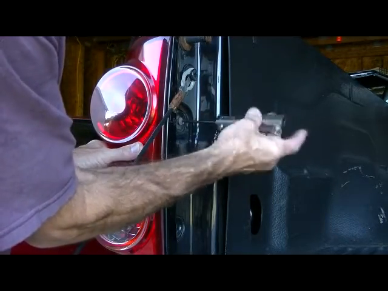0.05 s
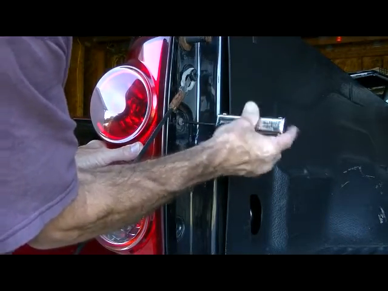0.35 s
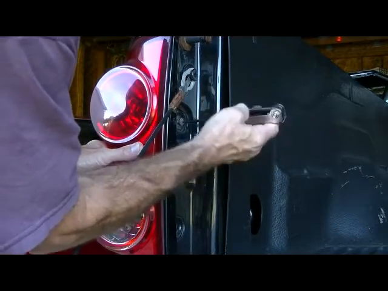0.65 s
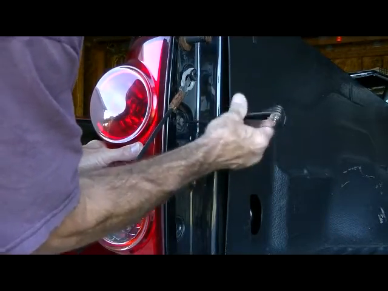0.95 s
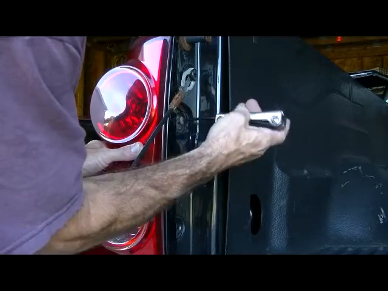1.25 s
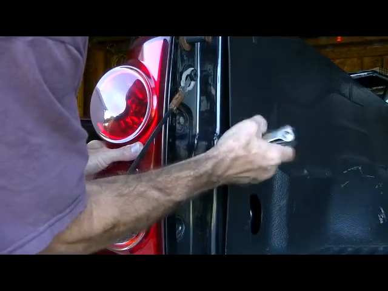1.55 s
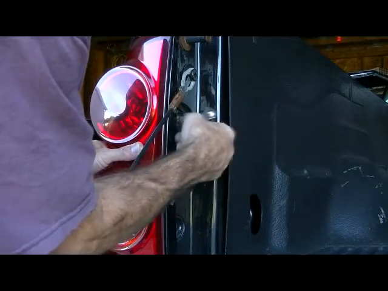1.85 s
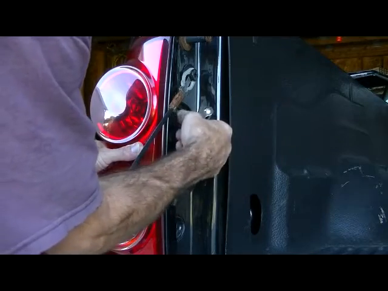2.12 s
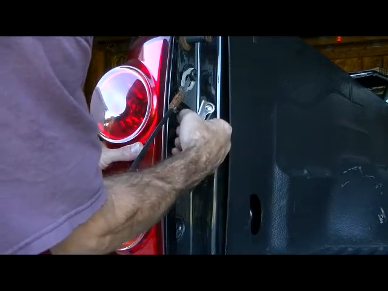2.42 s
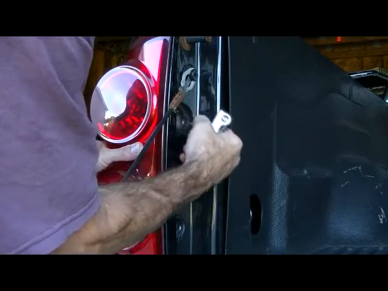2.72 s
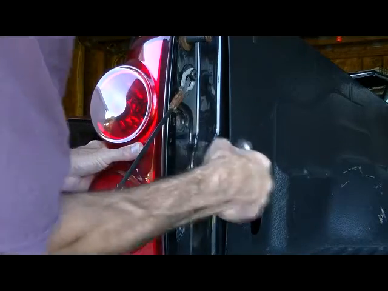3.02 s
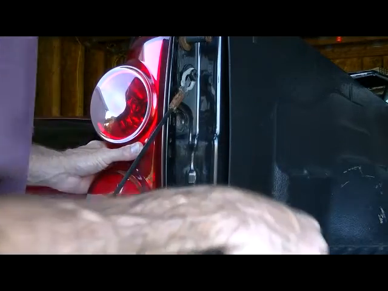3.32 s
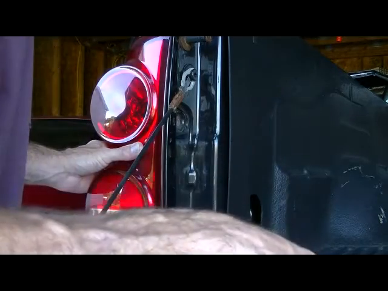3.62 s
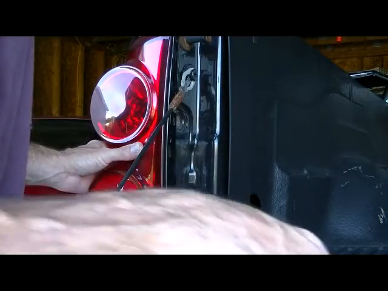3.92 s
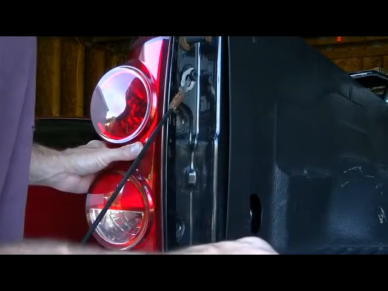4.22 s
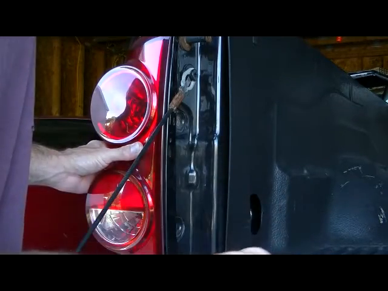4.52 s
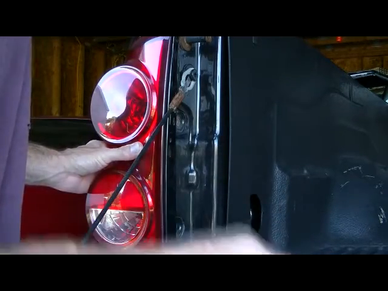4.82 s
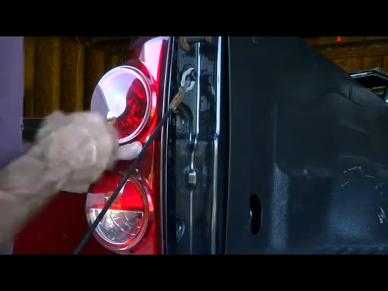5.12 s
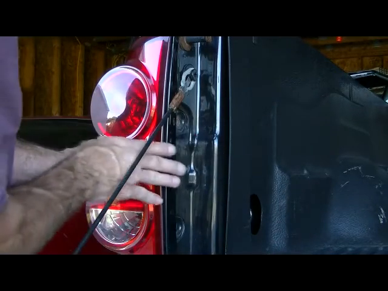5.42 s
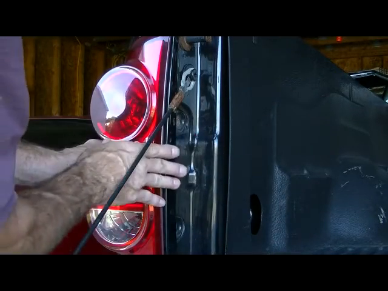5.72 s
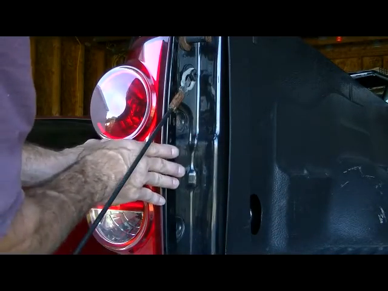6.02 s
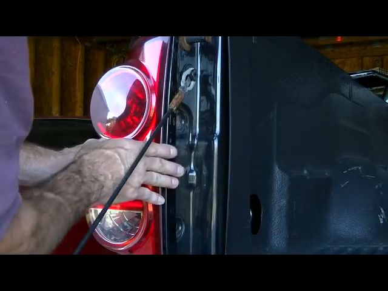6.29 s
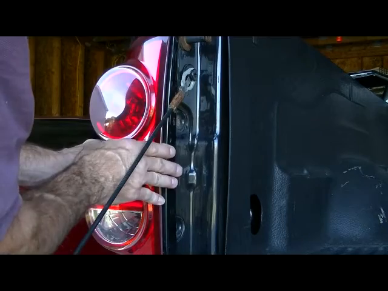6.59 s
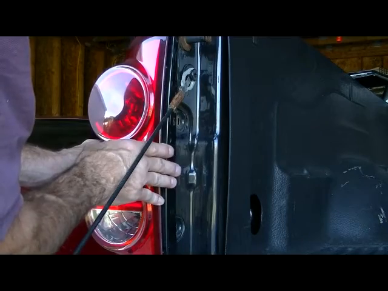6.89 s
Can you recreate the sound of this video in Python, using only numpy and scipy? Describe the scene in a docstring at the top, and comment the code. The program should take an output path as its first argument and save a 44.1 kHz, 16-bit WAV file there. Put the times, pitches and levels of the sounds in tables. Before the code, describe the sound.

Over soft outdoor air and a far motor hum that slowly sinks in pitch, a steel tool ticks and rasps at a screw while a plastic lamp housing bumps. Midway comes a quick, bright clatter as the tool lands on a lined tailgate, then louder hollow knocks. Quiet rubbing and small plastic bumps follow. Everything is heard close by, leaning right, with a slight echo from a shed roof.

```python
"""Outdoor air and a far motor, slowly sinking in pitch, sound throughout. Under a shed roof a folding steel
key set unscrews a truck's plastic tail lamp: strokes scrape in tiny slips, keys tick, the bumped housing
booms; a faint high whine lasts until 2 s. At 3.7 s the key set clatters onto the plastic-lined tailgate.
From 4.5 s heavy knocks ring the hollow panel. From 6.1 s hands rub and bump the loose lamp."""
import sys
import numpy as np
from scipy import signal
from scipy.fft import rfft, irfft, next_fast_len
from scipy.io import wavfile
from scipy.ndimage import map_coordinates

SR = 44100
rng = np.random.default_rng(int(sys.argv[2]) if len(sys.argv) > 2 else 0)


def master_out(mix):
    """Clip the mix to full scale and print it as 16-bit PCM to the path in sys.argv[1]."""
    frames = np.transpose(np.atleast_2d(mix))
    ceiling = np.clip(frames, -1, 1)
    pcm = np.round(ceiling * 32767).astype(np.int16)
    wavfile.write(sys.argv[1], SR, pcm)


N = 310974

# outdoor air spectrum: (frequency [Hz], level [dB])
AIR_SPECTRUM = [(15, -72), (25, -49), (37, -35), (59, -30), (116, -11), (144, -12.5), (169, -5.5),
                (198, -10), (260, -8.5), (378, -14.5), (445, -11.5), (804, -10.5), (2920, -25),
                (4380, -25.5), (15500, -38)]
# broad air resonances: (centre [Hz], width [Hz], level [dB])
AIR_RESONANCES = [(73, 17, -22), (174, 37, -16), (855, 31, -11.5), (4460, 140, -23)]
# left-right likeness of the air: (frequency [Hz], correlation [0..1])
AIR_COHERENCE = [(60, 1), (130, 0.44), (290, 0), (640, 0.14), (3000, 0.12), (15000, 0.13)]
# far motor's main tone: (time [s], pitch [Hz], level [dB])
MOTOR_GLIDE = [(0, 120.2, -63), (2.4, 119.3, -58.5), (4.2, 116.5, -63.5), (5.3, 114, -70),
               (6.1, 104.8, -61), (7.05, 100.3, -58)]

# rubbing strokes: (start [s], rise [s], length [s], groan [dB], rasp [dB], scrape [dB])
RUB_STROKES = [(0.005, 0.021, 0.14, -45.5, -52.5, -52.5), (0.122, 0.03, 0.089, -49.5, -65, -61),
               (0.428, 0.025, 0.16, -43, -50, -48.5), (0.614, 0.024, 0.2, -51, -65, -62),
               (1.018, 0.039, 0.058, -49, -49, -52), (1.12, 0.035, 0.095, -42.5, -53.5, -52),
               (2.382, 0.022, 0.12, -47.5, -53, -54.5), (2.545, 0.016, 0.065, -46, -41, -51),
               (3.15, 0.099, 0.32, -71, -70, -63), (4.264, 0.03, 0.028, -54, -67, -54.5),
               (6.101, 0.062, 0.1, -57, -61, -56.5), (6.221, 0.0065, 0.018, -43, -48.5, -74),
               (6.37, 0.065, 0.19, -54.5, -53.5, -57), (6.624, 0.045, 0.14, -54.5, -54.5, -56),
               (6.78, 0.047, 0.062, -55.5, -57, -64)]
# housing groan: (frequency [Hz], level [dB])
GROAN_SPECTRUM = [(30, -50), (90, -24), (200, 0), (450, 1), (570, 1), (720, 4.5), (1050, -2), (1400, -8.5),
                  (3500, -32)]
# thread rasp: (frequency [Hz], level [dB])
RASP_SPECTRUM = [(700, -20), (1100, 1), (1500, -1), (1870, 5), (2080, 0), (2300, -5.5), (2600, 3),
                 (2900, -18.5), (5000, -23), (7000, -48)]
# scrape: (frequency [Hz], level [dB])
SCRAPE_SPECTRUM = [(1500, -8), (3000, 1), (3900, 2), (4400, 6.5), (4800, 0), (5200, 2), (6300, -14),
                   (8000, -8), (10300, -7.5), (12500, -17), (15000, -38)]
# grit in the scrape: (frequency [Hz], level [dB])
GRIT_SPECTRUM = [(4000, -25), (7000, 19), (10500, -17), (12500, -4), (15000, -3)]

# decay of dense panel modes: (frequency [Hz], T60 [s])
PANEL_DECAY = [(100, 0.64), (300, 0.5), (700, 0.25), (1800, 0.18), (4800, 0.11), (7500, 0.073),
               (12000, 0.023)]
# keys ticking on their holder: (time [s], level [dB], brightness [dB], ring [Hz])
KEY_TICKS = [(0.048, -12, -2, 3020), (0.059, -15, -12, 3210), (0.151, -29, -13, 4470),
             (0.192, -32, -7, 4750), (0.451, -32.5, 2, 10600), (0.656, -28, -9, 3600),
             (0.934, -34, -19, 3900), (1.068, -28, -13, 11600), (1.077, -35, 3, 12000),
             (1.172, -29, -7, 8550), (1.212, -27.5, -16, 5670), (1.322, -29, -34, 3640),
             (1.599, -29, -18, 2330), (2.381, -23, -12, 3700), (5.578, -29.5, -41, 2070),
             (5.746, -40, 1.5, 13100), (6.527, -29.5, -12, 4450), (6.744, -33, -5, 4460)]
# modes common to all keys: (frequency [Hz], level [dB], T60 [s])
KEY_MODES = [(2280, -7, 0.15), (3190, -13, 0.13), (3610, -6, 0.1), (4280, -3.5, 0.074), (4560, -12, .055),
             (6121, -1.5, 0.11), (6770, -2, 0.088), (10900, -6, 0.055), (12100, -7, 0.044),
             (13330, -14, .04)]
# key tick colour: (frequency [Hz], gain [dB])
TICK_EQ = [(40, -61), (300, -12), (1000, -4.5), (1500, -16.5), (2000, 1.5), (2600, -8), (3300, -0.5),
           (4800, 0), (6600, -6.5), (7500, -4.5), (10000, -6.5), (11900, 5), (13000, -8), (15500, -14)]

# housing shifting in its seat: (time [s], level [dB], thump [dB], hardness [dB], ring [Hz], lift [dB])
HOUSING_BUMPS = [(0.149, -33, 10, 11, 463, 7), (0.181, -30, 11.5, 4, 433, 3), (0.244, -43, 15, -10, 232, 7),
                 (0.458, -24.5, -4, -16, 670, 8), (0.835, -34.5, 13, 2, 504, 7.5),
                 (1.052, -18.5, -17, -2, 970, 5), (1.080, -12.5, -4.5, -1.5, 320, 7),
                 (1.134, -25, 2.5, -2, 696, 14), (1.178, -27.5, 6.5, 0, 1030, 12),
                 (1.318, -23, -27, 0, 764, 10), (2.146, -19, -22.5, -7, 660, 11),
                 (2.258, -27.5, -12, -5, 793, 17.5), (2.38, -14.5, -14, -5.5, 495, 11),
                 (3.192, -43.5, 9.5, 11, 344, 6.5), (6.226, -25.5, 9.5, -5, 573, 6),
                 (6.279, -29.5, 5, -6, 382, 13)]
# lamp housing modes: (frequency [Hz], level [dB], T60 [s])
HOUSING_MODES = [(196, -4.5, 0.39), (236.2, -5.5, 0.27), (338, -6.5, 0.51), (463, -5.5, 0.84),
                 (552.3, 15, 0.084), (681, -0.5, 0.31), (849.4, 11, 0.076), (1049, 5.5, 0.19),
                 (1560, -24, 0.16), (2020, -2, 0.14), (2700, -12, .08)]
# housing bump colour: (frequency [Hz], gain [dB])
BUMP_EQ = [(35, -31), (110, 0.5), (200, 9), (400, 7.5), (800, 4), (1600, -0.5), (3000, -4), (5000, -6),
           (6500, -9), (11500, -5), (15000, -16)]

# key set hitting the liner: (time [s], level [dB], thump [dB], hardness [dB])
CLATTER_HITS = [(3.6518, -12, -33, -4), (3.6908, -2.5, -12, 5), (3.814, -18.5, -8, -15),
                (3.836, -16, -6.5, -33), (3.846, -32, 9, 10), (3.8612, 1.5, -30, -4.5),
                (3.8745, -1, -22, -1), (3.892, -18, -12, 1), (3.9125, -6.5, -14, -3),
                (3.946, -18, -15, -10), (4.075, -30.5, 1, -7), (4.233, -31, 2, -7), (4.293, -23, -14, -16)]
# modes of the key set on the liner: (frequency [Hz], level [dB], T60 [s])
KEY_SET_MODES = [(627, -6, 0.22), (937, -4.5, 0.12), (1030, -4, 0.059), (1235, -8.5, 0.16),
                 (1425, -1, 0.074), (1704, -23, 0.073), (1815, -1.5, 0.087), (2405, 7, 0.033),
                 (2850, 12, 0.023), (3000, -3, 0.033), (3170, 4, 0.027), (4430, -1, 0.048),
                 (4960, 10, 0.02), (5270, 16, 0.011), (8550, 11, 0.018)]
# clatter colour: (frequency [Hz], gain [dB])
CLATTER_EQ = [(35, -23), (110, 0), (180, 1.5), (400, 7), (600, 6.5), (950, 7.5), (1300, -3.5), (1700, 1),
              (2100, -3), (3000, -4), (3900, -5.5), (5200, -3), (6400, -10.5), (8400, -6.5), (10500, -19),
              (15000, -32)]

# heavy tailgate knocks: (time [s], level [dB], thump [dB], hardness [dB])
TAILGATE_KNOCKS = [(4.5304, -10.5, -6, -17), (4.572, -28, 8, 4), (4.7137, 5, -6, -1.5),
                   (4.826, 3, -16.5, -12.5), (4.830, 5, -5, -1), (4.837, 2, -0.5, -6.5)]
# lined tailgate modes: (frequency [Hz], level [dB], T60 [s])
TAILGATE_MODES = [(179.7, -3, 0.2), (219.8, 2.5, 0.22), (337, 1, 0.29), (402.6, 4, 0.15), (482, -2.5, 0.37),
                  (532, -5, 0.29), (606, 0, 0.2), (743, 7.5, 0.081), (802, 3.5, 0.073), (860, 4, 0.085),
                  (1058, 1.5, 0.078), (1264, 2, 0.075), (1430, 7, 0.071), (1535, -4, 0.14),
                  (2190, -2, 0.12), (2354, -1.5, 0.13), (2750, -15, .11), (3530, -11, 0.069),
                  (4160, -7, 0.087), (4570, -1, 0.098), (5200, 0, 0.084)]
# knock colour: (frequency [Hz], gain [dB])
KNOCK_EQ = [(35, -30), (80, -29), (125, -5), (210, 3.5), (270, 1), (400, 4), (750, 7.5), (1150, 2.5),
            (1500, 6.5), (2000, 0.5), (3000, -5), (5200, -0.5), (6300, -3), (9000, -3.5), (15000, -24)]

# shed reverberation: (frequency [Hz], T60 [s])
SHED_DECAY = [(100, 0.45), (500, 0.54), (2000, 0.39), (6000, 0.54), (14000, 0.59)]
# balance of the work sounds: (frequency [Hz], left minus right [dB])
WORK_BALANCE = [(110, -12), (380, -8), (700, -6.5), (1300, -4.5), (2400, -3.5), (8000, -2)]
# balance of the background: (frequency [Hz], left minus right [dB])
BACKGROUND_BALANCE = [(60, -15), (110, -8.5), (200, -3.5), (400, -3), (2400, -1.5), (15000, 0)]


def amp(db):
    """Decibels to gain."""
    return 10 ** (np.asarray(db) / 20)


def unit_rms(x):
    """Scale to rms 1."""
    return x / np.sqrt(np.mean(x ** 2) + 1e-20)


def curve(points, hz):
    """Read (frequency, value) points on a log-frequency axis."""
    knots_hz, values = np.transpose(points)
    return np.interp(np.log(hz + 1), np.log(knots_hz + 1), values)


def wobble(rate_hz):
    """Smooth random curve, rate_hz knots a second."""
    knots = rng.standard_normal(int(N * rate_hz / SR) + 4)
    return map_coordinates(knots, [np.arange(N) * rate_hz / SR])


def filtered(x, gain):
    """Zero-phase filter, response gain(hz)."""
    size = next_fast_len(N + SR // 2)
    return irfft(rfft(x, size) * gain(np.fft.rfftfreq(size, 1 / SR)), size)[..., :N]


def coloured(x, gain_db, size=32768):
    """Minimum-phase filter for a short sound, response gain_db(hz)."""
    cepstrum = irfft(np.log(amp(gain_db(np.fft.rfftfreq(size, 1 / SR)))))
    cepstrum[1:size // 2] *= 2
    cepstrum[size // 2 + 1:] = 0
    return irfft(rfft(x, size) * np.exp(rfft(cepstrum)))[:len(x)]


def panned(x, balance):
    """Lean each frequency left or right."""
    return filtered(x, lambda hz: amp(np.outer([.5, -.5], curve(balance, hz))))


def add(track, time_s, sound):
    """Mix a sound in at time_s."""
    part = track[max(round(time_s * SR), 0):][:len(sound)]
    part += sound[:len(part)]


def outdoor_air():
    """Steady stereo noise with a few broad resonances."""
    def mid_side_gain(hz):
        angle_rad = np.arccos(np.clip(curve(AIR_COHERENCE, hz), -1, 1)) / 2
        peak_power = sum(amp(db) ** 2 / (1 + (2 * (hz - centre_hz) / width_hz) ** 4)
                         for centre_hz, width_hz, db in AIR_RESONANCES)
        power = amp(curve(AIR_SPECTRUM, hz)) ** 2 + peak_power
        return np.sqrt(power) * [np.cos(angle_rad), np.sin(angle_rad)]
    mid, side = filtered(rng.standard_normal((2, N)), mid_side_gain)
    breeze = amp(.5 * wobble(3))
    return amp(-51.5) * breeze * unit_rms(np.array([mid + side, mid - side]))


def wavering_tone(hz, db):
    """Sine wavering slightly in pitch and level."""
    phase_rad = 2 * np.pi * np.cumsum(hz + .7 * wobble(9)) / SR
    return amp(db + 1.5 * wobble(6)) * unit_rms(np.sin(phase_rad))


def far_motor(undertone_fade_db_per_s=1.4, hum_rise_db_per_s=0.4):
    """Two motor tones sink together beside a hum of steady pitch."""
    t = np.arange(N) / SR
    times_s, pitches_hz, levels_db = np.transpose(MOTOR_GLIDE)
    pitch_hz = np.interp(t, times_s, pitches_hz)
    undertone = wavering_tone(hz=0.64 * pitch_hz, db=-65.5 - undertone_fade_db_per_s * t)
    main = wavering_tone(hz=pitch_hz, db=np.interp(t, times_s, levels_db))
    hum = wavering_tone(hz=172.6, db=-66 + hum_rise_db_per_s * t)
    return main + undertone + hum


def stroke_force(start_s, rise_s, length_s, sag_db_per_s=53, release_db_per_s=240):
    """Force builds, eases while sliding and dies when the hand stops."""
    t = np.maximum(np.arange(N) / SR - start_s, 0)
    sag_db = sag_db_per_s * np.maximum(t - rise_s, 0)
    release_db = release_db_per_s * np.maximum(t - length_s, 0)
    return np.minimum(t / rise_s, 1) * amp(-sag_db - release_db)


def friction(spectrum, slips_per_s, spread_db):
    """Dense tiny slips of uneven size, rms 1."""
    slipping = rng.random(N) < slips_per_s / SR
    slips = slipping * rng.standard_normal(N) * amp(spread_db * wobble(120))
    return unit_rms(filtered(slips, lambda hz: amp(curve(spectrum, hz))))


def rubbing():
    """Fingers, screw and housing slide in short strokes: shell groans, thread rasps, grit scrapes."""
    forces = sum(np.outer(amp(levels_db), stroke_force(start_s, rise_s, length_s))
                 for start_s, rise_s, length_s, *levels_db in RUB_STROKES)
    groan = friction(GROAN_SPECTRUM, slips_per_s=12000, spread_db=0)
    rasp = friction(RASP_SPECTRUM, slips_per_s=3300, spread_db=3.5)
    scrape = friction(SCRAPE_SPECTRUM, slips_per_s=5600, spread_db=1.5)
    grit = amp(-16) * friction(GRIT_SPECTRUM, slips_per_s=250, spread_db=12.5)
    return np.sum(forces * [groan, rasp, scrape + grit], axis=0)


def noise_tail(decay):
    """0.5 s of noise, energy 1: bass builds later, each frequency fades at its own rate."""
    hz, t, spectra = signal.stft(rng.standard_normal(SR // 2), SR, nperseg=256)
    swell = 1 - np.exp(-np.outer(hz, t + t[1] / 2) / 3)
    fade = amp(-60 * t / curve(decay, hz)[:, None])
    tail = signal.istft(spectra * swell * fade, SR, nperseg=256)[1][:SR // 2]
    return tail / np.linalg.norm(tail)


def contact(modes, chatter_t60_s, chatter_db, ring_db, panel_db):
    """One blow: a push, brief chatter, clear modes and a haze of dense panel modes."""
    t = np.arange(SR // 2) / SR
    fade = lambda t60_s: np.exp(-np.log(1000) * t / t60_s)
    push = 1.73 * (t == 0)
    chatter = rng.standard_normal(len(t)) * fade(chatter_t60_s)
    ring = np.zeros(len(t))
    for hz, db, t60_s in modes:
        blur_rad = np.cumsum(rng.standard_normal(len(t))) * .0011 * np.sqrt(hz)  # loose parts
        swell = 1 - np.exp(-t * hz / 1.7)  # builds over a few cycles
        gain = amp(db + 1.8 * rng.standard_normal())
        ring += gain * swell * fade(t60_s) * np.sin(2 * np.pi * hz * t + blur_rad)
    return (push + amp(chatter_db) * chatter / np.linalg.norm(chatter)
            + amp(ring_db) * ring / np.linalg.norm(ring) + amp(panel_db) * noise_tail(PANEL_DECAY))


def bell_db(hz, centre_hz, height_db, width_hz):
    """One resonance peak; a dip if the height is negative."""
    return height_db / (1 + (2 * (hz - centre_hz) / width_hz) ** 2)


def key_ticks():
    """Small steel contacts ring high and briefly, each key at its own pitch."""
    out = np.zeros(N)
    for time_s, db, bright_db, ring_hz in KEY_TICKS:
        modes = np.vstack([KEY_MODES, (ring_hz, -5, .07)])
        tick = contact(modes, chatter_t60_s=0.011, chatter_db=10.5, ring_db=4.5, panel_db=2.5)
        shelf = [(5000, 0), (10000, bright_db)]
        gain_db = lambda hz: (curve(TICK_EQ, hz) + curve(shelf, hz)
                              + bell_db(hz, ring_hz, height_db=8.5, width_hz=540))
        add(out, time_s, amp(db) * coloured(tick, gain_db))
    return out


def touch_db(hz, thump_db, hard_db, snap_db=-19.5):
    """Weight behind a blow adds bass; a harder contact adds treble."""
    return curve([(300, thump_db), (1100, 0), (3300, hard_db), (9000, hard_db + snap_db)], hz)


def housing_bumps():
    """The lamp housing gives softly and booms; each contact point favours one resonance."""
    out = np.zeros(N)
    for time_s, db, thump_db, hard_db, ring_hz, lift_db in HOUSING_BUMPS:
        blow = contact(HOUSING_MODES, chatter_t60_s=0.034, chatter_db=7, ring_db=1.5, panel_db=12.5)
        gain_db = lambda hz: (curve(BUMP_EQ, hz) + touch_db(hz, thump_db, hard_db)
                              + bell_db(hz, ring_hz, lift_db, width_hz=112))
        add(out, time_s, amp(db) * coloured(blow, gain_db))
    return out


def whine(centre_hz=7950, width_hz=300, on_s=0.18, off_s=2.04, fade_s=0.25):
    """A faint, narrow band of high noise fades in and out."""
    t = np.arange(N) / SR
    band = filtered(rng.standard_normal(N), lambda hz: 1 / (1 + (2 * (hz - centre_hz) / width_hz) ** 4))
    envelope = np.clip(np.minimum(t - on_s, off_s - t) / fade_s, 0, 1)
    return amp(-75) * envelope * unit_rms(band)


def key_set_clatter():
    """The steel key set drops and rocks on the plastic liner: bright, dry clacks with a hollow core."""
    out = np.zeros(N)
    for time_s, db, thump_db, hard_db in CLATTER_HITS:
        blow = contact(KEY_SET_MODES, chatter_t60_s=0.012, chatter_db=12, ring_db=9, panel_db=6)
        gain_db = lambda hz: (curve(CLATTER_EQ, hz) + touch_db(hz, thump_db, hard_db)
                              + bell_db(hz, centre_hz=1000, height_db=-2, width_hz=92)
                              + bell_db(hz, centre_hz=1620, height_db=2.5, width_hz=220))
        add(out, time_s, amp(db) * coloured(blow, gain_db))
    return out


def tailgate_knocks():
    """Heavier blows set the whole hollow panel ringing."""
    out = np.zeros(N)
    for time_s, db, thump_db, hard_db in TAILGATE_KNOCKS:
        blow = contact(TAILGATE_MODES, chatter_t60_s=0.019, chatter_db=11, ring_db=2.5, panel_db=6.5)
        gain_db = lambda hz: (curve(KNOCK_EQ, hz) + touch_db(hz, thump_db, hard_db)
                              + bell_db(hz, centre_hz=380, height_db=3, width_hz=40)
                              + bell_db(hz, centre_hz=1480, height_db=-1, width_hz=78))
        add(out, time_s, amp(db) * coloured(blow, gain_db))
    return out


def shed_reverb(x, delay_s=0.009):
    """Roof and walls answer differently at each ear."""
    tails = np.array([noise_tail(SHED_DECAY), noise_tail(SHED_DECAY)])
    delayed = np.pad(x, (round(delay_s * SR), 0))
    return signal.fftconvolve(delayed[None], tails, axes=1)[:, :N]


def scene():
    """Close work, a little to the right, over the outdoor background."""
    work = key_set_clatter() + tailgate_knocks() + housing_bumps() + key_ticks() + rubbing()
    reverb = amp(-16.5) * shed_reverb(work)
    background = outdoor_air() + far_motor() + whine()
    return panned(work + reverb, WORK_BALANCE) + panned(background, BACKGROUND_BALANCE)


def record(dry, ceiling_db=-1, cutoff_hz=15850):
    """Soft saturation of the hardest peaks, then a brick-wall low-pass."""
    rounded = dry / (1 + (dry / amp(ceiling_db)) ** 4) ** (1 / 4)
    return filtered(rounded, lambda hz: hz < cutoff_hz)


dry = scene()
out = record(dry)
master_out(out)
```